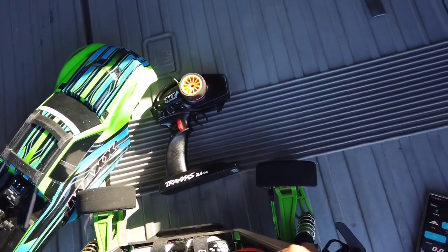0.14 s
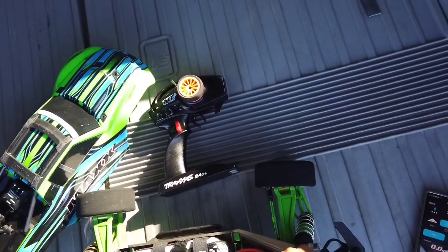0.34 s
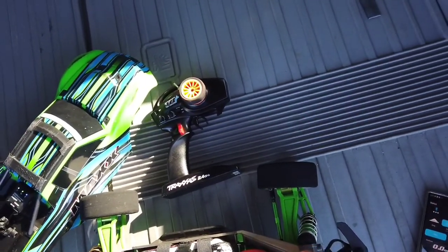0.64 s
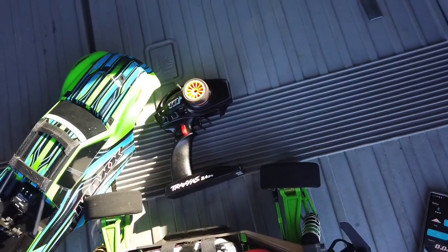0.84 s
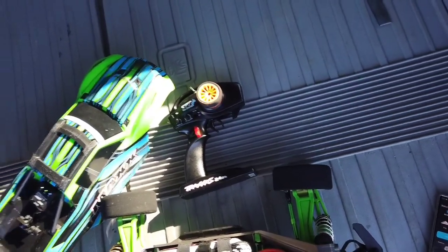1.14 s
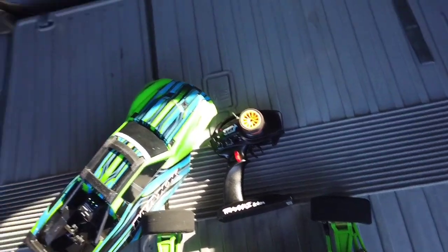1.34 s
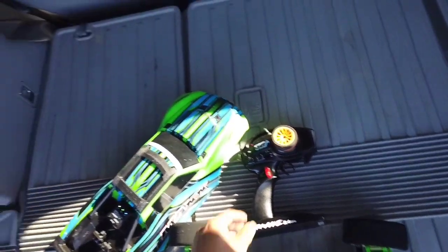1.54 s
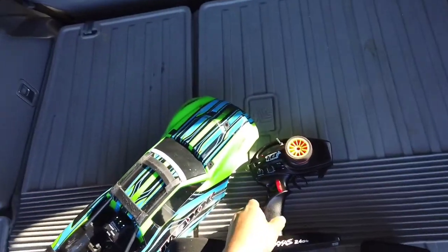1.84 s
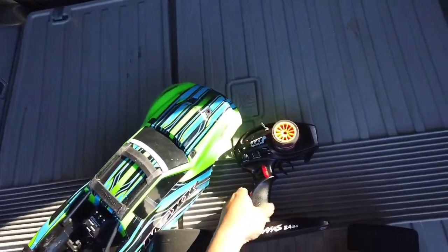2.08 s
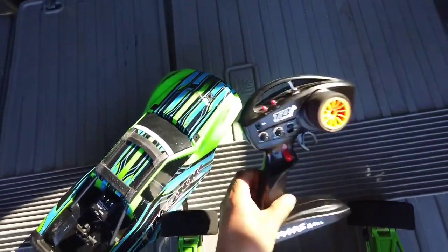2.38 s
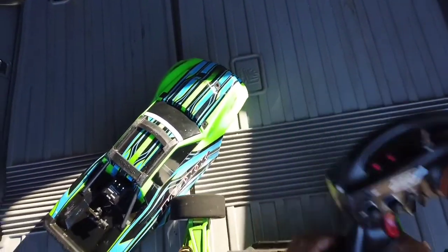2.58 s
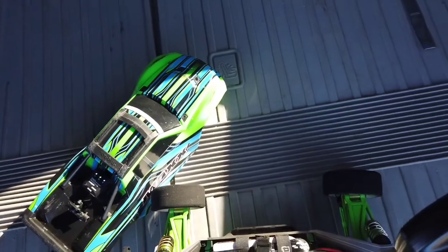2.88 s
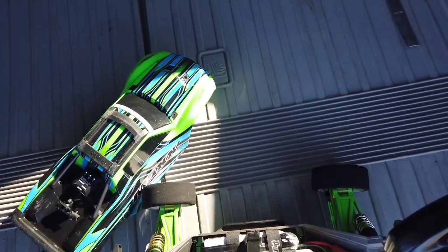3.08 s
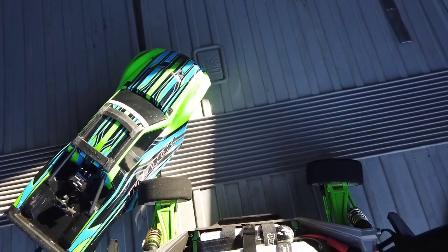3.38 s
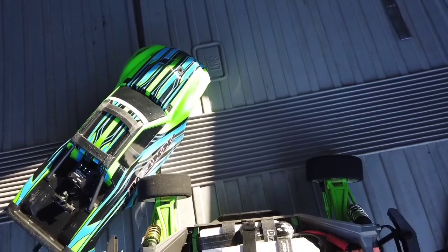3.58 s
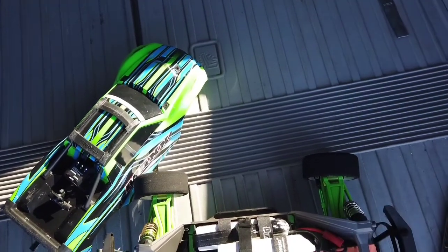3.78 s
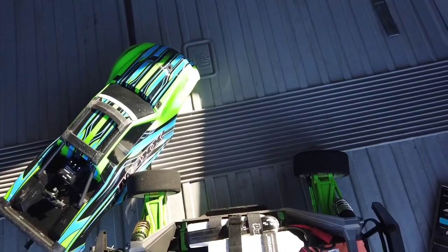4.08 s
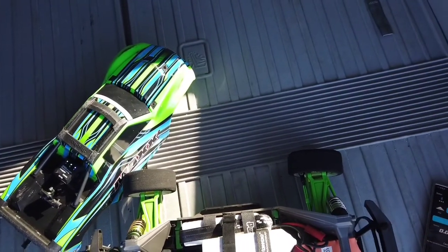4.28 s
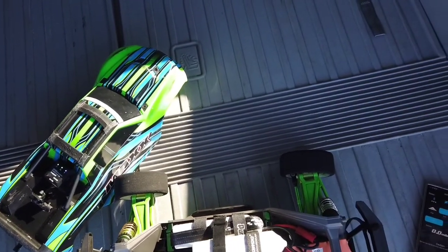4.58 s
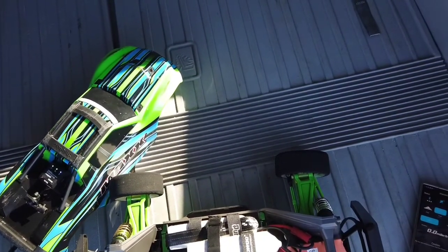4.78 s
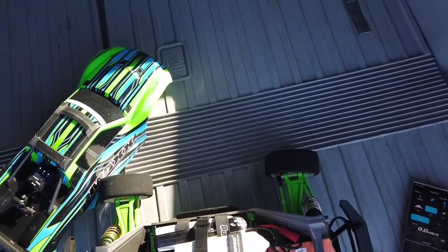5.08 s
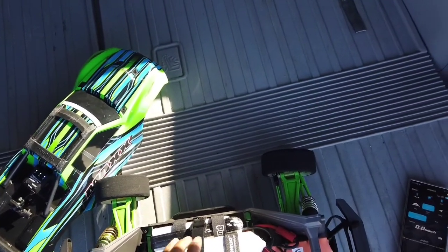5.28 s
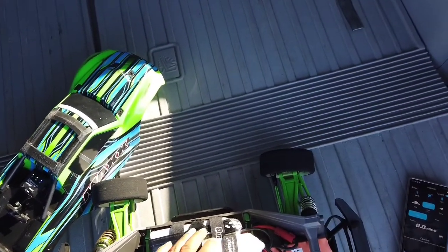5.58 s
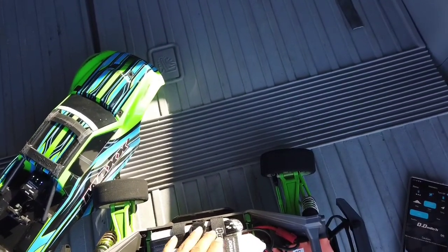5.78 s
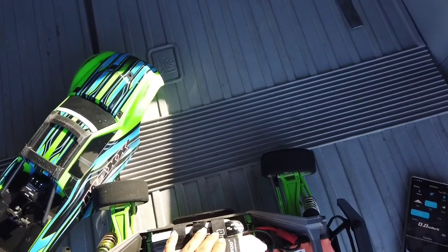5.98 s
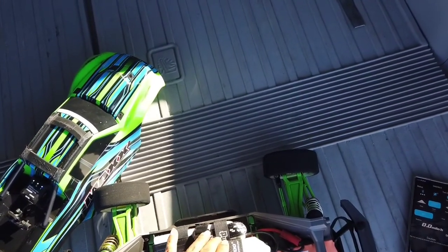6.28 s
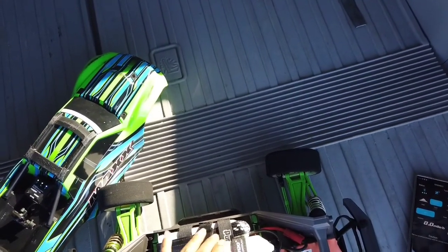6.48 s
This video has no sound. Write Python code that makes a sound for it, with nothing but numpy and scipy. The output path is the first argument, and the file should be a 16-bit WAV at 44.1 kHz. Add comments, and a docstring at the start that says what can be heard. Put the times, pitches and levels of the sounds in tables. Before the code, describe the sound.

For the first 0.9 seconds there is almost nothing: a faint distant outdoor wash and slight breeze. Between 0.92 and 1.09 four tiny, dry plastic switch ticks sound, the middle two loudest. From 1.05 motor coils buzz faintly and small fans start, their pitch climbing steeply, flickering as it rises, and nearly settling around 2.2 on a piercing whine near 3.3 kilohertz with thin higher overtones. Slower fans hum and sing a lower tone near 2.3 kilohertz, their octave beating slightly, within a bright, steady rush of air. From 2.0 to 3.0 and again about 3.4 to 4.6, deep wind gusts thump and rumble on the microphone, strongest near 2.2, 2.8, 3.5 and 3.9, briefly ducking the fans. Afterwards the shrill whine and hiss continue, overtones swelling and fading as the close hand-held microphone shifts, with barely a soft low gust near 6.4, still running at the 6.6-second end.

```python
"""A faint distant wash and a light breeze; then a switch ticks and motor coils buzz in the open back of a car.
The cooling fans of a radio-controlled truck start up: a seven-blade fan winds up to a piercing whine, slower
fans hum beside it, and turbulence adds a rush of air. Later, gusts buffet the hand-held microphone and the
strongest push its limiter down. Rotors are sums of sines on a common shaft phase; air and wind are shaped noise."""
import sys
import numpy as np
from scipy import signal
from scipy.fft import rfft, irfft
from scipy.io import wavfile
from scipy.ndimage import uniform_filter1d, minimum_filter1d

SR = 44100
rng = np.random.default_rng(int(sys.argv[2]) if len(sys.argv) > 2 else 0)


def master(y):
    """Save y as 16-bit WAV."""
    cut = np.clip(np.atleast_2d(y).T, -1, 1)
    pcm = np.round(cut * 32767)  # scale
    wavfile.write(sys.argv[1], SR, pcm.astype(np.int16))


N = 292383
TIME = np.arange(N) / SR  # t/s

# Spectrum of the distant wash: [f/Hz, relative spectral level/dB]
OUTDOORS_COLOUR = [(88, -47), (150, -6.5), (200, -9), (252, -14), (294, -4.5), (357, -13), (525, -3.5),
                   (624, -7.5), (991, -7), (2700, -24.5), (15000, -32)]
OUTDOORS_DB = -68

# Spectrum of the large eddies that sway the diaphragm: [f/Hz, relative spectral level/dB]
SWAY_COLOUR = [(1, -60), (2.5, 5.5), (5, 9), (12, -2), (22, -7), (45, -39.5)]
# Spectrum of the push of a gust: [f/Hz, relative spectral level/dB]
PUSH_COLOUR = [(8, -28), (15, -9.5), (28, 1), (45, -18.5), (65, -22.5), (110, -62)]
# Spectrum of the small buffeting eddies: [f/Hz, relative spectral level/dB]
BUFFET_COLOUR = [(30, 2.5), (60, 1), (100, -7.5), (150, -23.5), (220, -32), (400, -48.5), (900, -52)]
# Gusts on the microphone: [start t/s, length t/s, slow push level/dB, quick buffeting level/dB]
GUSTS = [(1.977, 0.13, -13, -26), (2.207, 0.25, -12, -23), (2.57, 0.24, -10.5, -21.5),
         (2.922, 0.023, -10, -25), (3.419, .04, -15, -23), (3.65, 0.13, -25.5, -47),
         (3.82, 0.35, -12.5, -21.5), (4.25, 0.11, -19, -40), (4.486, 0.012, -23, -35),
         (4.584, 0.058, -16.5, -44), (5.553, 0.014, -51, -54), (6.341, 0.23, -25.5, -55)]
GUST_RISE_DB_PER_S, GUST_FALL_DB_PER_S = 278, 154
BUFFET_POWER = 1.87  # small eddies come later and die sooner than the push of their gust
CALM_PUSH_DB, CALM_BUFFET_DB = -75.5, -68  # breeze between the gusts
DRAUGHT_PUSH_DB, DRAUGHT_BUFFET_DB = -54, -66.5  # draught of the fans at full speed
# The strongest eddies shove the diaphragm out and back once: [t/s, peak level/dB]
SHOVES = [(2.219, -0.5), (2.762, -3), (3.48, -1), (3.884, -2), (3.982, 1)]
SHOVE_S = 0.022

# Switch ticks: [t/s, peak level/dB]
TICKS = [(0.919, -54), (0.954, -48), (1.022, -46), (1.089, -52)]
# Modes of the switch housing: [f/Hz, relative level/dB, 60 dB decay time t/s]
SWITCH_MODES = [(4150, -7, .015), (4600, -12, .012), (6700, -1, .006), (8700, -2, .006), (11500, 1, .006)]

# Spectrum of the low roar of air: [f/Hz, relative spectral level/dB]
ROAR_COLOUR = [(170, -22.5), (280, -20.5), (340, -7), (480, -11), (700, -7), (900, -0.5), (2300, -0.5),
               (3200, -5)]
# Spectrum of the rush of air: [f/Hz, relative spectral level/dB]
RUSH_COLOUR = [(700, -34), (2300, -5), (3000, 1), (3600, 3), (4850, 3), (5200, -6.5), (7000, -9),
               (9000, -17)]
# Spectrum of the hiss of air: [f/Hz, relative spectral level/dB]
HISS_COLOUR = [(3500, -59), (5500, 3), (7200, 1), (8800, 6.5), (9900, 9.5), (11200, 4.5), (12700, -2),
               (15500, -33)]
# Peaks and dips of the body shell: [f/Hz, width f/Hz, level/dB]
SHELL = [(1060, 28, 3.5), (1335, 54, -2), (1630, 260, 3), (1770, 95, -4), (2353, 200, -2), (3480, 84, 1)]
# Common air level: its full-speed value sinks slowly as the microphone drifts away
RUSH_DB, RUSH_FADE_DB_PER_S = -29.5, 0.28
TURBULENT_SHARE = 0.21  # share of full speed at which the air flow turns turbulent
FLARE_S, FLARE_WIDTH_S, FLARE_DB = 3.83, 0.011, 5.5  # the rush flares briefly
TONE_DB_PER_OCTAVE, AIR_DB_PER_OCTAVE = 14, 18  # blade tones and air grow louder with speed

# Resonances of the fan frames: [f/Hz, width f/Hz, relative level/dB]
FRAME = [(1690, 290, -1), (3140, 350, -4), (4560, 400, 3.5), (8700, 1100, -16)]
# The coils buzz as the rotors break loose
BUZZ_FROM_S, BUZZ_RISE_S, BUZZ_HOLD_S, BUZZ_FADE_DB_PER_S, BUZZ_DB = 1.046, 0.12, .2, 60, -62.5

BLADES = 7
# S-shaped run-up of the slow fans: [start t/s, settling time t/s, sluggishness at first (no unit)]
SLOW_RUN = (1.102, .194, 1.08)
SLOW_HZ = 326.2  # shaft rate of the first slow fan at full speed
APART_HZ = 1.6  # the second one turns a little faster
HUM_FROM_S, BLADES_FROM_S = 1.28, 1.45
# Hum lines: [shaft order, full-speed level before the panels/dB, gain per octave of speed/dB]
HUM = [(2, -58.5, 11), (3, -58, 26), (4, -60, 8.5)]
LOAD_DB = 3  # extra hum during the run-up
# Panels of the mount, which the hum sweeps through: [f/Hz, width f/Hz, level/dB]
MOUNT = [(397, 85, -21), (587, 55, 14.5), (795, 39, 9), (952, 23, 11), (1156, 130, 13.5)]
# Reference level of the slow fans' blade tone: [t/s, full-speed level/dB]
BLADE_DB = [(1.6, -46), (1.75, -45.5), (2.05, -43), (2.53, -34), (3.82, -35), (3.97, -44.5), (6.31, -35.5),
            (6.61, -42.8)]
# Reference level of the octave of that tone: [t/s, full-speed level/dB]
OCTAVE_DB = [(1.64, -43), (3.0, -39), (3.5, -49), (4.8, -38.5), (5.25, -42), (6.6, -50)]
# Bearing drone: [multiple of a third of the shaft rate, full-speed level/dB]
BEARING = [(4, -65.5), (5, -55.5), (7, -61), (10, -54), (11, -53.5), (15, -52.5)]

# S-shaped run-up of the fast fan: [start t/s, settling time t/s, sluggishness at first (no unit)]
FAST_RUN = (.921, .2875, 4.534)
FAST_HZ = 3316  # blade-passing rate of the fast fan at full speed
WHINE_FROM_S = 1.1
# The whine's four harmonics swell and fade as the microphone moves through their standing waves.
# First harmonic: [t/s, full-speed level/dB]
FIRST_DB = [(1.4, -32), (1.5, -32), (1.68, -28), (1.9, -21), (2.08, -28.5), (2.13, -21), (2.62, -21.5),
            (2.69, -34), (2.75, -20.5), (2.81, -33.5), (2.99, -25), (3.09, -30), (3.53, -23), (4.31, -17.5),
            (4.45, -20.5), (5.42, -21), (5.66, -24), (6.62, -19.5)]
# Second harmonic: [t/s, full-speed level/dB]
SECOND_DB = [(1.62, -22), (1.76, -32), (2.14, -57), (2.26, -34), (2.62, -33), (2.71, -47), (2.86, -35),
             (3.4, -40.2), (3.61, -34), (3.82, -36), (4.0, -50.5), (4.45, -30.5), (5.45, -42.5),
             (5.52, -55), (5.68, -36), (6.25, -35.5), (6.61, -41)]
# Third harmonic: [t/s, full-speed level/dB]
THIRD_DB = [(1.6, -47), (1.69, -38), (2.2, -44.9), (2.32, -57.3), (2.56, -32), (2.77, -52), (3.01, -30.8),
            (3.55, -38), (3.64, -50.2), (3.79, -35), (4.33, -42), (4.48, -34.5), (5.44, -33), (5.56, -52),
            (5.62, -35.5), (6.61, -39)]
# Fourth harmonic: [t/s, full-speed level/dB]
FOURTH_DB = [(1.8, -43), (4.2, -56.1), (5.16, -46), (6.0, -56), (6.33, -48), (6.6, -50.2)]
# High harmonics heard only during wind-up, until they pass the upper band limit:
# [multiple, full-speed level before the band limit/dB]
TOP = [(5, -46.5), (6, -54)]
OVERTONE_POWER = 2  # overtones grow faster with speed than the whine itself

EDGE_HZ = 15550  # upper band limit


def amp(db):
    """Decibel law: level to amplitude ratio."""
    return 10 ** (np.asarray(db) / 20)


def evened(x):
    """Normalisation of a signal to rms 1."""
    return x / np.sqrt(np.mean(x ** 2) + 1e-20)


def after(s):
    """Linear onset: a 10 ms fade-in from silence at time s."""
    return np.clip((TIME - s) / 0.01, 0, 1)


def level(rows):
    """Linear interpolation of (t/s, value) rows, at every sample."""
    return np.interp(TIME, *np.transpose(rows))


def drift(hz):
    """Low-pass random process: slow fluctuation of rms 1, up to about hz."""
    f = np.fft.rfftfreq(N, 1 / SR)
    return evened(irfft(rfft(rng.standard_normal(N)) / (1 + (f / hz) ** 4), N))


def noise(colour, band, bumps=()):
    """Spectral shaping: coloured noise with optional peaks and dips, of rms 1 within the band."""
    f = np.fft.rfftfreq(N, 1 / SR)
    hz, db = np.transpose(colour)
    shape_db = np.interp(np.log(f + 1), np.log(hz + 1), db)
    for centre, width, bump_db in bumps:
        shape_db = shape_db + bump_db * np.exp(-((f - centre) / width) ** 2)
    rolloff = np.hypot(1, (f / (2 * hz[-1])) ** 2)
    spectrum = rfft(rng.standard_normal(N)) * amp(shape_db) / rolloff
    in_band = irfft(spectrum * (f > band[0]) * (f < band[1]), N)
    return irfft(spectrum, N) / np.std(in_band)


def steadied(x, size):
    """Level equalisation: takes the slow chance swells out of a noise."""
    return x / np.sqrt(uniform_filter1d(x ** 2, size) / np.mean(x ** 2) + 0.0011)


def speed(start_s, settle_s, sluggish):
    """Drag-limited run-up: share of full speed, slow at first, then fast, then settling (floor 0.02)."""
    left = np.exp(-np.maximum(TIME - start_s, 0) / settle_s)
    return np.maximum((1 - left) / (1 + sluggish * left), .02)


def angle(hz, wander, hunt):
    """Phase as the integral of frequency: speed hunts slowly and wavers, more while still gaining speed."""
    unsteady = wander + .014 * (1 - hz / hz.max()) ** 1.68
    wavering_hz = hz * (1 + unsteady * drift(24.5) + hunt * drift(.8))
    return 2 * np.pi * np.cumsum(wavering_hz) / SR


def tone(phase, db, flutter_db):
    """Amplitude modulation: one spectral line, fluttering in the uneven air flow."""
    rms = amp(db + flutter_db * drift(24.5))
    return np.sqrt(2) * rms * np.sin(phase + rng.uniform(0, 2 * np.pi))


def outdoors():
    """Diffuse background: stationary coloured noise as a faint distant wash."""
    return amp(OUTDOORS_DB) * noise(OUTDOORS_COLOUR, (150, 15000))


def gust(start_s, length_s):
    """Exponential envelope: the gain of one gust rises quickly, holds and dies away."""
    early = np.maximum(start_s - TIME, 0)
    late = np.maximum(TIME - start_s - length_s, 0)
    return amp(np.maximum(-GUST_RISE_DB_PER_S * early - GUST_FALL_DB_PER_S * late, -200))


def wind():
    """Eddy scales: large eddies sway the diaphragm, gusts push it, and small eddies buffet it in lumps."""
    draught = speed(*SLOW_RUN) ** 2
    push_gain = amp(CALM_PUSH_DB) + amp(DRAUGHT_PUSH_DB) * draught
    buffet_gain = amp(CALM_BUFFET_DB) + amp(DRAUGHT_BUFFET_DB) * draught
    for start_s, length_s, push_db, buffet_db in GUSTS:
        shape = gust(start_s, length_s)
        push_gain = np.hypot(push_gain, amp(push_db) * shape)
        buffet_gain = np.hypot(buffet_gain, amp(buffet_db) * shape ** BUFFET_POWER)
    sway = steadied(noise(SWAY_COLOUR, (2, 22)), size=12000)
    push = steadied(noise(PUSH_COLOUR, (22, 60)), size=4000)
    buffet = steadied(noise(BUFFET_COLOUR, (60, 200)), size=2500)
    lumps = evened(amp(3.5 * drift(14)))
    return sway * amp(-8) * push_gain ** .44 + push * push_gain + buffet * lumps * buffet_gain


def shoves():
    """Infrasonic pulses: one slow pressure swing per strong eddy, too low to hear but working the limiter."""
    out = np.zeros(N)
    for s, db in SHOVES:
        u = (TIME - s) / SHOVE_S
        out += amp(db) * (1 - u ** 2) * np.exp(-u ** 2 / 2)
    return out


def switch():
    """Impulse response: each tick rings the damped modes of the small plastic housing."""
    t = TIME[:1500]
    ring = .8 * rng.standard_normal(len(t)) * np.exp(-t / .001)  # short noise burst
    for hz, db, t60 in SWITCH_MODES:
        ring = ring + amp(db - 60 * t / t60) * np.sin(2 * np.pi * hz * t)
    blows = np.zeros(N)
    for s, db in TICKS:
        blows[round(s * SR)] = amp(db)
    return signal.oaconvolve(blows, ring / abs(ring).max())[:N]


def rush_level():
    """Onset of turbulence: air level in dB follows the mean speed of the fans once the flow is turbulent."""
    mean_speed = (speed(*FAST_RUN) + speed(*SLOW_RUN)) / 2
    onset_db = -20 * np.log10(1 + (TURBULENT_SHARE / mean_speed) ** 3.4)
    flare_db = FLARE_DB * np.exp(-((TIME - FLARE_S) / FLARE_WIDTH_S) ** 2)
    speed_db = AIR_DB_PER_OCTAVE * np.log2(mean_speed)
    return RUSH_DB + speed_db + onset_db + flare_db - RUSH_FADE_DB_PER_S * TIME


def air():
    """Aerodynamic noise: blade turbulence as roar and rush, coloured by the shell, and a hiss opening with speed."""
    rush_db = rush_level()
    slowness = -np.log2(speed(*FAST_RUN))  # octaves below full speed
    roar = noise(ROAR_COLOUR, (700, 2000), SHELL)
    rush = noise(RUSH_COLOUR, (3600, 6000), SHELL)
    hiss = noise(HISS_COLOUR, (7200, 9400))
    roar = roar * amp(rush_db - 9.5 + 4.9 * slowness + 0.67 * drift(26))
    rush = rush * amp(rush_db - 1.4)
    hiss = hiss * amp(rush_db - 10.5 - 4.8 * slowness + 0.5 * drift(26))
    return (roar + rush + hiss) * amp(0.73 * drift(27)) * after(BUZZ_FROM_S)


def start_buzz():
    """Forced resonance: uneven coil kicks, four a turn, ring the fan frames until the rotors run free."""
    turns = np.cumsum(FAST_HZ * speed(*FAST_RUN) / BLADES) / SR
    kicks = np.diff(np.floor(4 * turns), prepend=0) * rng.standard_normal(N)
    t = TIME[:600]
    ring = np.zeros(len(t))
    for hz, width, db in FRAME:
        ring += amp(db) * width ** 2 * t * np.exp(-np.pi * width * t) * np.sin(2 * np.pi * hz * t)
    buzz = signal.oaconvolve(kicks, ring)[:N]
    age, free_s = TIME - BUZZ_FROM_S, BUZZ_RISE_S + BUZZ_HOLD_S
    fade_db = BUZZ_FADE_DB_PER_S * np.maximum(age - free_s, 0)
    envelope = np.clip(age / BUZZ_RISE_S, 0, 1) ** 2 * amp(BUZZ_DB - fade_db)
    return buzz / np.std(buzz[(age > 0) & (age < free_s)]) * envelope


def panels_db(line_hz):
    """Resonant response of the mount's panels, in dB, to a line at line_hz."""
    return sum(db * np.exp(-((line_hz - centre) / width) ** 2) for centre, width, db in MOUNT)


def slow_fans():
    """Beats: the blade-tone octaves of two like fans lie close in pitch; shaft hum and bearing drone join."""
    share = speed(*SLOW_RUN)
    hz, octaves = SLOW_HZ * share, np.log2(share)
    first = angle(hz, wander=0.00023, hunt=0.00119)
    second = angle(hz + APART_HZ, wander=0.00047, hunt=.0012)
    load_db = LOAD_DB * np.minimum(1, 30 * (1 - share))  # louder while the motors still pull hard
    hum = 0
    for order, db, slope_db in HUM:
        line_db = db + slope_db * octaves + panels_db(order * hz) + load_db
        hum = hum + tone(order * first, line_db, flutter_db=2.5)
    # the unbalance shakes the mount as the speed passes its resonance
    mount_db = -58 - ((hz - 284) / 7.5) ** 2
    shake = tone(first, mount_db, flutter_db=2)
    effort_db = TONE_DB_PER_OCTAVE * octaves
    blade_db, octave_db = level(BLADE_DB) + effort_db, level(OCTAVE_DB) + effort_db
    blades = tone(BLADES * first, blade_db - 2.4, flutter_db=1.5)
    blades = blades + tone(3 * BLADES * first, blade_db - 16, flutter_db=7.5)
    octave = tone(2 * BLADES * first, octave_db - 7, flutter_db=6.0)
    octave = octave + tone(2 * BLADES * second, octave_db, flutter_db=2.5)
    cage = first / 3  # the bearing cage turns at a third of the shaft rate
    drone = sum(tone(k * cage, db, flutter_db=2.5) for k, db in BEARING) * share ** 40
    return (hum + shake) * after(HUM_FROM_S) + (blades + octave + drone) * after(BLADES_FROM_S)


def fast_fan():
    """Blade-passing tone: blades chop the air past the struts; unbalance adds lines a shaft rate to each side."""
    share = speed(*FAST_RUN)
    hz = FAST_HZ * share
    phase = angle(hz, wander=0.00013, hunt=0.000201)
    effort_db = TONE_DB_PER_OCTAVE * np.log2(share)
    # the tone flickers at random while it is still gaining speed
    run_up_db = 1.8 * np.minimum(1, 10 * (1 - share))
    whine = tone(phase, level(FIRST_DB) + effort_db, flutter_db=.5 + run_up_db)
    overtones = 0
    for k, rows in enumerate((SECOND_DB, THIRD_DB, FOURTH_DB), 2):
        overtone_db = level(rows) + OVERTONE_POWER * effort_db
        overtones = overtones + tone(k * phase, overtone_db, flutter_db=1.14 + 1.5 * run_up_db)
    top = sum(tone(k * phase, db + OVERTONE_POWER * effort_db, flutter_db=0) for k, db in TOP)
    sidebands = sum(tone(phase * (1 + side / BLADES), rush_level(), flutter_db=3) for side in (-1, 1))
    bite = 1 / (1 + (1000 / hz) ** 8)  # slow blades hardly sing
    return (whine + overtones + top + amp(-20.5) * sidebands) * bite * after(WHINE_FROM_S)


def scene():
    """Superposition of weather, switch and fans at one microphone."""
    weather = outdoors() + wind() + shoves()
    fans = air() + start_buzz() + slow_fans() + fast_fan()
    return (weather + switch() + fans)[None]


def record(dry):
    """Peak limiting: the strongest gusts duck everything; then a low-pass sets the band limit."""
    ceiling = .88
    room = np.minimum(1, ceiling / (abs(dry[0]) + 1e-9))
    limited = dry * uniform_filter1d(minimum_filter1d(room, size=1700), size=1500)
    lowpass = signal.firwin(1023, EDGE_HZ, window=("kaiser", 9), fs=SR)
    return signal.oaconvolve(limited, lowpass[None], "same")


dry = scene()
out = record(dry)
master(out)
```